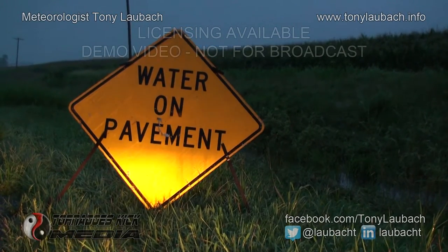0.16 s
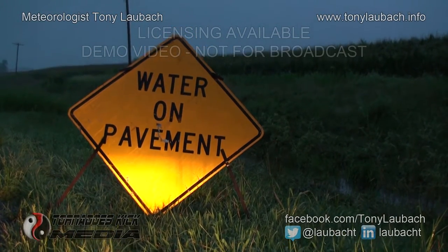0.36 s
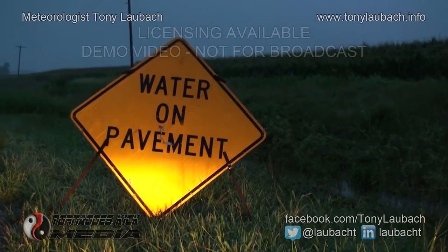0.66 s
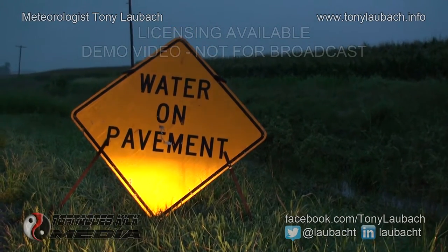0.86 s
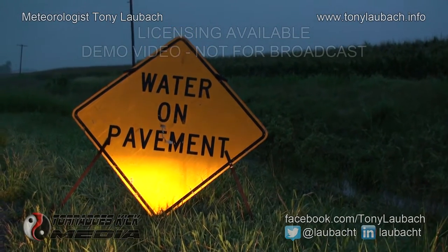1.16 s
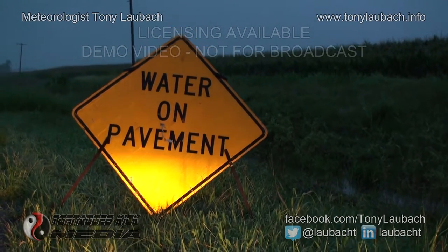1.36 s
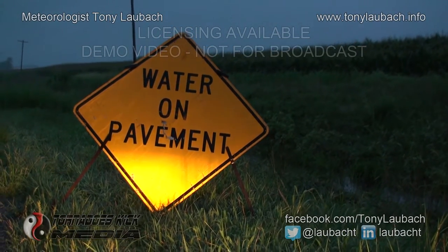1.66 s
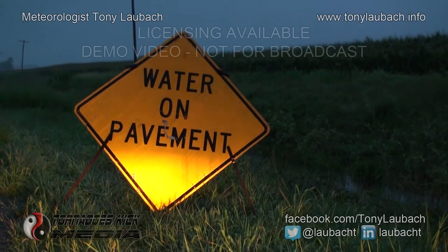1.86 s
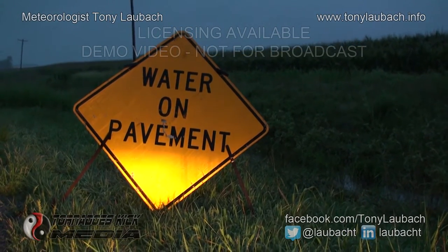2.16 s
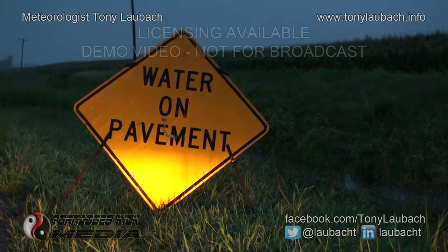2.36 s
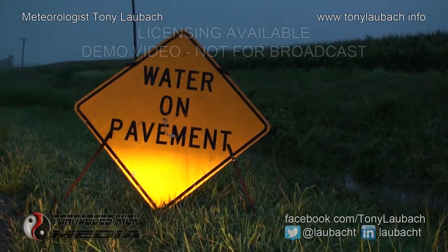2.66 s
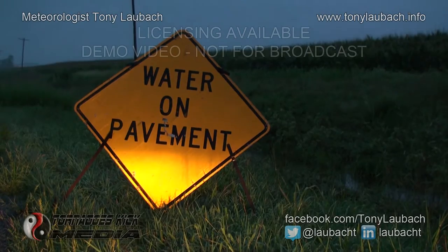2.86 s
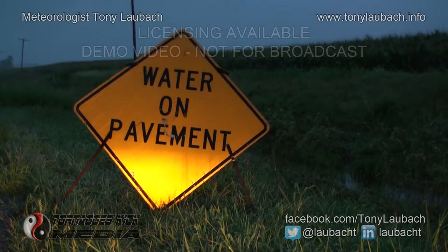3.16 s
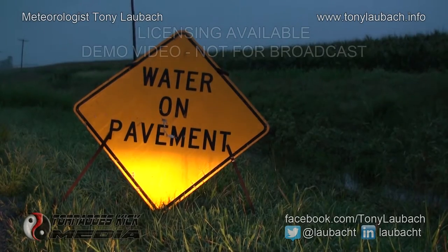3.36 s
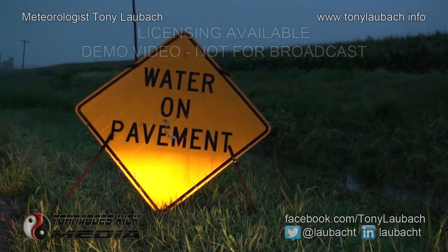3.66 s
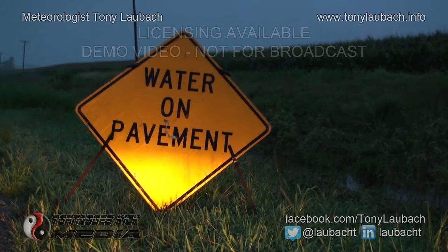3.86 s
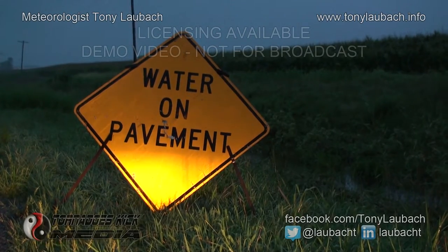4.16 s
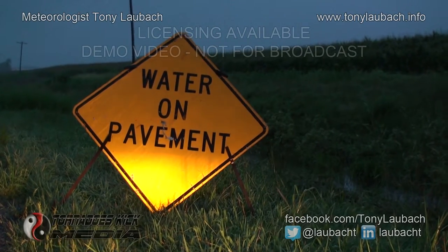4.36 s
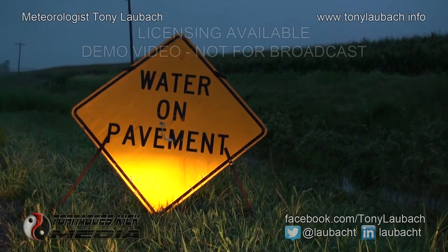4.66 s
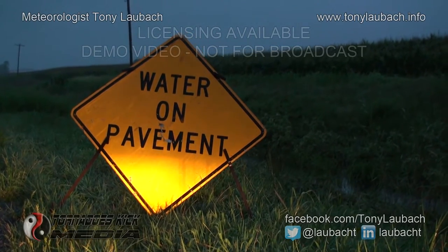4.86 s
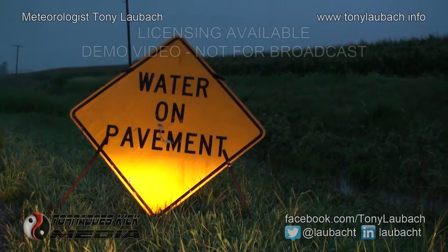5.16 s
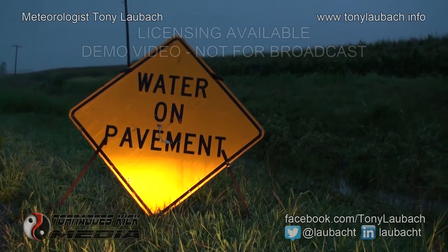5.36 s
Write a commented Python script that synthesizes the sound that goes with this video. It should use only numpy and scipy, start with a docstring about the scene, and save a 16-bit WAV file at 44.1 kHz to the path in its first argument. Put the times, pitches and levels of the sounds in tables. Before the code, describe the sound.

A quiet open roadside with a fixed stereo microphone: a faint wide rush of air, lightly pulsing high insect trills and a low, steady engine idle close by. From the start a distant vehicle is a thin wet hiss, with a slight puddle swell in the first half second. At about 1.4 s there is one small, soft, short knock. From 2 s the tyre hiss rises in uneven surges, stronger around 3 and 3.4 s, with low throbs and a faint drivetrain drone. From 3.7 s deeper water brings continuous bright spray and fine mist over tread noise and roar, growing fast and leaning left. Close echoes give a hollow, upward-sweeping colour around 4.5 to 5.2 s. The rush is loudest near 5 s; the vehicle draws level at about 5.3 s with booming, ringing tyre resonances, the drone sinking and the finest hiss falling away as the sound ends at 5.5 s.

```python
"""Car passing on a flooded road

A vehicle comes up a wet country road and draws past on the left, its tyres hissing, throbbing and throwing
spray: filtered noise and tiny random impacts, made louder and quieter by distance, angle and puddles.
A nearby surface adds short echoes; the notches they cut glide upward as the vehicle comes close.
An engine idles close by (sine waves), insects trill (pulsing bands of noise), something knocks once (ringing
sines), and open country rushes faintly (noise)."""
import sys
import numpy as np
from scipy import signal
from scipy.fft import rfft, irfft, next_fast_len
from scipy.io import wavfile
from scipy.ndimage import uniform_filter1d, map_coordinates

SR = 44100
rng = np.random.default_rng(int(sys.argv[2]) if len(sys.argv) > 2 else 0)


def store_pcm(level_fs):
    """Save levels as 16-bit WAV."""
    pcm = np.round(np.clip(level_fs, -1, 1) * 32767).astype(np.int16)
    wavfile.write(sys.argv[1], SR, np.atleast_2d(pcm).T)


N = 242991

# Basic curves of the pass, which each layer may scale or shift:
# t/s, left against right/dB, scattered against direct sound/dB
PASS_CURVES = [(0, 1, 5.5), (1.5, 1.5, 3), (2.5, 2, -0.5), (3.3, 2.5, -1.5), (4.3, 3.5, -0.5),
               (4.9, 4.5, -1), (5.25, 5.5, 7.5), (5.51, 7, 10.5)]
# Echo from a nearby surface: t/s, lag/ms, strength in the middle range (0-1), strength at all frequencies (0-1)
ECHO_CURVES = [(0, 1.42, 0.15, 0.1), (2.5, 1.41, 0.14, 0.11), (3.5, 1.39, 0.18, 0.1),
               (4.1, 1.36, 0.28, 0.08), (4.45, 1.29, 0.28, 0.08), (4.74, 1.24, 0.72, 0.08),
               (4.97, 1.21, 0.62, 0.06), (5.12, 1.1, 0.1, 0.02), (5.16, 0.48, 0.1, 0),
               (5.3, 0.6, 0.22, 0.03), (5.51, 0.66, 0.32, 0.12)]
# Tone colours of the noises, each later brought to its own loudness: f/Hz, relative level per Hz/dB
RUMBLE_SPECTRUM = [(25, -26), (60, -11), (90, -4.5), (140, 0), (210, -2), (285, -0.5), (340, -2.5),
                   (430, -14), (700, -30)]
ROAR_SPECTRUM = [(220, -57), (380, 0), (480, 0), (620, 1.5), (800, -0.5), (1050, 2), (1300, -5.5),
                 (2200, -36)]
TREAD_SPECTRUM = [(700, -40), (1050, -10.5), (1300, -2), (1500, 0), (1850, 0.5), (2150, -2), (2500, -1.5),
                  (2950, -4), (3500, -8), (5500, -46)]
HISS_SPECTRUM = [(1900, -22), (2700, -5), (3300, 2), (3700, 2.5), (4100, 4), (5000, -1.5), (5700, -7),
                 (7000, -6), (10000, -52)]
SPRAY_SPECTRUM = [(3500, -33), (4900, -2), (5600, -2), (7000, -2), (8200, -2.5), (9000, -4.5), (10500, -27),
                  (14000, -50)]
MIST_SPECTRUM = [(6500, -17.5), (8500, -5), (9500, 2), (10500, 2), (11100, 0), (11550, 1.5), (12150, -1),
                 (12700, -4), (13800, -7), (15500, -25)]
FIELD_SPECTRUM = [(25, -19), (70, -6), (200, -2), (340, 5), (450, 3), (680, 7), (1000, 4.5), (1300, 9),
                  (1850, -0.5), (2100, -1), (2500, 0.5), (2950, -9), (3500, 1), (4150, -8), (4430, -12),
                  (4800, -6.5), (5600, -6), (7000, -11), (9000, -11), (12500, -23), (14000, -48)]
# Tones of the idling engine, before their small wavering: f/Hz, rms level/dB
IDLE_TONES = [(38.7, -63), (77.4, -58.5), (97.2, -52.5), (134, -58), (206, -54)]
# Insect choruses, before pulsing and wavering: f/Hz, width/Hz, level/dB, pulse rate/Hz
INSECT_CHORUSES = [(7130, 870, -56.5, 19), (8070, 110, -68, 64), (6030, 310, -63.5, 63)]
# Drivetrain drone, sinking with the Doppler shift: t/s, base pitch/Hz, level/dB
DRIVE_CURVES = [(0, 72.8, -66), (2, 72.7, -55), (3, 71.64, -56), (3.55, 70.7, -46), (4.3, 69.3, -50),
                (4.8, 68.1, -52), (5.2, 66, -49), (5.51, 62, -48)]
# Tones of that drone: multiple of the base pitch, level added to the drone's/dB
DRONE_TONES = [(2, -6), (4, -2), (4.6, -8), (5.85, -10)]
# Resonances of wheel wells and tread grooves, before the echo:
# t of the peak/s, length/s, f/Hz, width/Hz, peak level/dB, left against right/dB
WHEEL_RESONANCES = [(5.5, 0.33, 73, 38, -51, -1), (5.37, 0.45, 161, 106, -38, 6),
                    (5.08, 0.43, 368, 99, -41.5, 7), (5.27, 0.33, 630, 350, -36.5, 10),
                    (5.22, 0.23, 1220, 450, -40.5, 17), (5.28, 0.57, 2330, 900, -34.5, 6.5),
                    (5.36, 0.51, 3070, 1000, -33.5, 8)]
# How each tyre layer radiates: level at the closest point before the side-on loss/dB,
# loss per doubling of distance/dB, loss side on/dB, half width of that loss/degrees
LAYER_RADIATION = {"rumble": (-34.5, 10, 7, 28.5), "roar": (-33, 14, 6, 29.5),
                   "tread": (-24.5, 17, 10, 26.5), "hiss": (-22.5, 21.5, 14, 36),
                   "spray": (-32.5, 19, 6, 19.5), "mist": (-38.5, 17, 7.5, 29)}
# Puddles: t of entry/s, length/s, depth (0-1), build-up time before a layer's own factor/s
PUDDLE_TIMES = [(0.046, 0.36, 0.37, 0.07), (2.036, 0.37, 0.15, 0.091), (2.497, 0.7, 0.34, 0.12),
                (2.938, 0.45, 0.94, 0.08), (3.416, 0.33, 0.79, 0.06), (3.716, 1.8, 1, 0.14)]
# Brief swells of noise in single bands: t of the peak/s, length/s, f/Hz, width/Hz, peak level/dB
NOISE_SWELLS = [(0.26, 0.07, 3970, 2000, -54), (0.6, 0.082, 3400, 2600, -60), (0.75, 0.38, 4910, 600, -59),
                (1.55, 0.25, 3470, 400, -67), (1.62, 0.046, 7350, 5000, -58), (2.02, 0.28, 3870, 400, -55),
                (2.13, 0.08, 7000, 2000, -49.5), (2.277, 0.059, 9500, 7000, -52),
                (2.548, 0.1, 10500, 4000, -52), (2.82, 0.24, 3930, 2230, -42),
                (2.924, 0.15, 3280, 260, -45), (3.015, 0.04, 6840, 3000, -41),
                (3.082, 0.092, 2450, 400, -43), (3.26, 0.077, 7100, 3500, -41),
                (4.174, 0.19, 2660, 400, -35.5), (4.273, 0.1, 5450, 500, -33), (4.33, 0.38, 1640, 500, -40),
                (4.8, 0.29, 11500, 2540, -32.5), (5.028, 0.18, 8000, 3000, -30.5),
                (5.194, 0.15, 4300, 2400, -30.5), (5.362, 0.06, 7050, 1800, -37)]
# Throbs on rough road: t of the peak/s, length/s, f/Hz, width/Hz, peak level/dB
ROAD_THROBS = [(2.238, 0.073, 284, 98, -48), (2.7, 0.24, 281, 50, -53), (2.75, 0.27, 143, 25, -52),
               (3.313, 0.08, 287, 98, -44), (3.36, 0.059, 105, 70, -43), (3.597, 0.13, 284, 70, -37.5),
               (3.902, 0.09, 289, 120, -42), (4.0, 0.19, 141, 50, -42), (4.016, 0.12, 310, 98, -44),
               (4.476, 0.09, 307, 98, -39), (4.658, 0.04, 272, 98, -40), (4.94, 0.04, 290, 160, -41.5),
               (5.059, 0.02, 140, 140, -37.5), (5.153, 0.06, 175, 120, -39), (5.265, 0.04, 176, 120, -39.5),
               (5.424, 0.075, 150, 140, -36)]
# Ringing of one faint knock: f/Hz, level added to the knock's/dB, time to fall by 60 dB/s
KNOCK_RINGING = [(738, -1, 0.082), (1980, 1, 0.09), (3470, -9, 0.05)]
# How the sound of the water falls away around the pass: start t/s, fall rate/(dB per s)
WATER_FALL = {"hiss": (5.355, 67), "spray": (5.316, 37), "mist": (5.08, 24)}

KNOCK_S, KNOCK_DB = 1.362, -38
# The straight drive: moment of drawing level, speed, closest distance
PASS_S, SPEED_M_PER_S, CLOSEST_M = 5.31, 13.11, 21
HISS_WET_DB, SPRAY_WET_DB, MIST_WET_DB = 5.0, 10.5, 15  # gain at full water: the finer the drops, the more
FILM_DEPTH = 0.18  # water amount (0-1) at which the hiss already has three quarters of its gain
SETTLE_S = 0.24  # decay time of thrown water after a puddle
HEAVY_BUILD, MIST_BUILD = 0.62, 0.58  # factors on the build-up time of the puddles
# An upright echo just ahead of the inverted one: its lag and gain as shares of the inverted one's
UPRIGHT_LAG, UPRIGHT_GAIN = 0.868, 0.46
# Dip in the right channel side on: centre, half width, depth (0-1), half width of the angle
SHADE_HZ, SHADE_WIDTH_HZ, SHADE_DEPTH, SHADE_DEG = 836, 550, 0.43, 16
TOP_HZ = 15700  # nothing is kept from here up


def amp(db):
    """Turns decibels into gain."""
    return 10 ** (np.asarray(db) / 20)


def unit(x):
    """Brings x to rms 1."""
    return x / np.sqrt(np.mean(x ** 2) + 1e-20)


def along(points, hz):
    """Reads (f/Hz, value) points along a log frequency axis."""
    f, values = np.transpose(points)
    return np.interp(np.log(hz + 1), np.log(f + 1), values)


def curves(rows):
    """Gives one value per sample for each column after the time."""
    times, *columns = np.transpose(rows)
    return [np.interp(np.arange(N) / SR, times, column) for column in columns]


def wobble(rate):
    """Draws a smooth random curve through `rate` random points a second."""
    knots = rng.standard_normal(int(N * rate / SR) + 4)
    return map_coordinates(knots, [np.arange(N) * rate / SR])


def swell(peak_s, length_s):
    """Rises and falls smoothly; `length_s` away from the peak, about 14 % is left."""
    return np.exp(-2 * ((np.arange(N) / SR - peak_s) / length_s) ** 2)


def filtered(x, response):
    """Multiplies the spectrum of x by a response of frequency."""
    size = next_fast_len(N + SR // 2)  # spare room keeps the end from wrapping onto the start
    gain = response(np.fft.rfftfreq(size, 1 / SR))
    return irfft(rfft(x, size) * gain, size)[..., :N]


def coloured(x, spectrum):
    """Gives x a spectrum that falls away above its last point, at rms 1."""
    top_hz = spectrum[-1][0]
    return unit(filtered(x, lambda hz: amp(along(spectrum, hz)) / (1 + (hz / top_hz / 2) ** 10)))


def band(x, hz, width_hz):
    """Keeps one resonance of x, `width_hz` wide at half gain, at rms 1."""
    return unit(filtered(x, lambda f: 1 / (1 + (2 * (f - hz) / width_hz) ** 4)))


def turbulence():
    """Draws two unrelated white noises: one heard directly, one scattered."""
    return rng.standard_normal((2, N))


def droplets(rate, size_db, share):
    """Mixes `rate` tiny unequal impacts a second into direct noise; share is their part of its power."""
    share = np.clip(share, 0, 1)
    strengths = amp(size_db * np.minimum(rng.exponential(size=N), 4))
    signs = rng.choice([-1, 1], N)
    impacts = unit(strengths * signs * (rng.random(N) < rate / SR))
    direct, scattered = turbulence()
    return np.array([np.sqrt(1 - share) * direct + np.sqrt(share) * impacts, scattered])


def place(pair, pan_db, side_db):
    """Leans direct sound to one side (left if positive); scattered sound differs between the ears."""
    direct, scattered = pair
    side = amp(side_db) * scattered
    lean = np.tanh(pan_db * np.log(10) / 40)  # makes the left-right difference exactly pan_db
    return np.array([direct * (1 + lean) + side, direct * (1 - lean) - side])


def drifting(x, depth_db, band_size, frame_size):
    """Narrow bands brighten and dull at random, as in moving air: fully until 1 s, then fading
    to a weaker drift from 4.5 s on."""
    _, t, z = signal.stft(x, SR, nperseg=512)
    patches = rng.standard_normal(z.shape[1:])
    for _ in range(2):
        patches = uniform_filter1d(patches, band_size, 0)
        patches = uniform_filter1d(patches, frame_size, 1)
    strength = np.interp(t, [1, 4.5], [1, .4])
    changed = z * amp(depth_db * strength * unit(patches))
    return signal.istft(changed, nperseg=512)[1][:, :N]


def delayed(x, lag_ms):
    """Plays both channels of x later, by a changing lag."""
    read_at = np.arange(N) - lag_ms * SR / 1000
    return np.array([map_coordinates(channel, [read_at]) for channel in x])


def position():
    """Follows a straight drive: distance (m), and angle from side on (degrees)."""
    ahead_m = SPEED_M_PER_S * (PASS_S - np.arange(N) / SR)
    return np.hypot(ahead_m, CLOSEST_M), np.degrees(np.arctan2(ahead_m, CLOSEST_M))


def side_on(width_deg):
    """Is 1 as the vehicle draws level and shrinks towards 0 away from side on."""
    _, angle_deg = position()
    return np.exp(-(angle_deg / width_deg) ** 2)


def passing_db(layer):
    """Grows a layer as the vehicle nears; tyres beam fore and aft, so it weakens side on."""
    level_db, doubling_db, side_loss_db, width_deg = LAYER_RADIATION[layer]
    distance_m, _ = position()
    doublings = np.log2(distance_m / CLOSEST_M)
    return level_db - doubling_db * doublings - side_loss_db * side_on(width_deg)


def field():
    """The faint, wide rush of open country: noise that drifts in slow patches."""
    rush = drifting(coloured(turbulence(), FIELD_SPECTRUM), depth_db=1.0, band_size=9, frame_size=28)
    return amp(-47 + 0.21 * wobble(4.0)) * place(rush, pan_db=0.0, side_db=-8.5)


def idle():
    """An idling engine hums in low tones that waver together in pitch and separately in strength."""
    clock = np.cumsum(1 + 0.0029 * wobble(3.13) + 0.0014 * wobble(14)) / SR
    hum = np.zeros(N)
    for hz, db in IDLE_TONES:
        strength = amp(db + 0.35 * wobble(4.34))
        hum += strength * np.sin(2 * np.pi * (hz * clock + rng.random()))
    return np.sqrt(2) * hum  # a sine of rms 1 peaks at the root of 2


def insects():
    """Many insects of each kind blur into a narrow, lightly pulsing band of noise."""
    chorus = np.zeros((2, N))
    for hz, width_hz, db, pulse_rate in INSECT_CHORUSES:
        pulse_phase = np.cumsum(pulse_rate * (1 + 0.048 * wobble(2.6))) / SR
        pulses = 1 + 0.19 * np.sin(2 * np.pi * pulse_phase)
        waver_db = 0.3 * wobble(5)
        kind = place(band(turbulence(), hz, width_hz), pan_db=-0.5, side_db=-10.0)
        chorus += amp(db + waver_db) * pulses * kind
    return chorus


def drivetrain():
    """Turning parts make a faint, rough drone whose pitch sinks as the vehicle draws level."""
    hz, db = curves(DRIVE_CURVES)
    pan_db, _ = curves(PASS_CURVES)
    turns = np.cumsum(hz * (1 + 0.0036 * wobble(8))) / SR
    drone = np.zeros(N)
    for multiple, level_db in DRONE_TONES:
        strength = amp(level_db + 1.5 * wobble(5.7))
        drone += strength * np.sin(2 * np.pi * (multiple * turns + rng.random()))
    return amp(db) * drone * amp(np.array([pan_db, -pan_db]) * 0.2)


def tyres():
    """Tyre bodies rumble, air roars around the wheels, and the tread pumps air and water from its grooves."""
    pan_db, scatter_db = curves(PASS_CURVES)
    rumble = place(coloured(turbulence(), RUMBLE_SPECTRUM), 1.0 * pan_db, -26.0 + 0.13 * scatter_db)
    roar = place(coloured(turbulence(), ROAR_SPECTRUM), 2.9 * pan_db - 6.5, -8.0 + 0.21 * scatter_db)
    grooves = coloured(droplets(rate=3000, size_db=3, share=0.27), TREAD_SPECTRUM)
    tread = place(grooves, 1.03 * pan_db, -12.5 + 1.04 * scatter_db)
    tread_db = passing_db("tread") + 0.26 * wobble(12)
    return amp(passing_db("rumble")) * rumble + amp(passing_db("roar")) * roar + amp(tread_db) * tread


def thrown_water(build_factor):
    """Water in the air (0-1): each puddle splashes up, holds and settles; the strongest one counts."""
    t = np.arange(N) / SR
    amounts = []
    for start_s, length_s, depth, build_s in PUDDLE_TIMES:
        rise = 1 - np.exp(-np.maximum(t - start_s, 0) / (build_factor * build_s))
        settling = np.exp(-np.maximum(t - start_s - length_s, 0) / SETTLE_S)
        amounts.append(depth * rise * settling)
    return np.max(amounts, axis=0)


def water_db(layer):
    """The level of a water layer along the pass, with its extra fall around the moment of passing."""
    start_s, db_per_s = WATER_FALL[layer]
    return passing_db(layer) - db_per_s * np.maximum(np.arange(N) / SR - start_s, 0)


def water():
    """The water film tears into hiss, spray and mist, swelling in puddles and surging together at random."""
    heavy, fine = thrown_water(HEAVY_BUILD), thrown_water(MIST_BUILD)
    pan_db, scatter_db = curves(PASS_CURVES)
    hiss = coloured(droplets(rate=3300, size_db=6.5, share=0.11), HISS_SPECTRUM)
    spray = coloured(droplets(rate=2900, size_db=1.5, share=0.36), SPRAY_SPECTRUM)
    mist = coloured(droplets(rate=3300, size_db=3.0, share=0.39), MIST_SPECTRUM)
    hiss_db = water_db("hiss") + HISS_WET_DB * np.tanh(heavy / FILM_DEPTH)
    spray_db = water_db("spray") + SPRAY_WET_DB * heavy
    mist_db = water_db("mist") + MIST_WET_DB * fine
    hiss = amp(hiss_db) * place(hiss, pan_db, -18.0 + scatter_db)
    spray = amp(spray_db) * place(spray, pan_db, -26.0 + 1.9 * scatter_db)
    mist = amp(mist_db) * place(mist, 1.26 * pan_db, -20 + 1.8 * scatter_db)
    surge_db = .42 * wobble(16) + .25 * wobble(70)
    return amp(surge_db) * (hiss + spray + mist)


def noise_swells():
    """Brief swells of grainy noise in single bands, from low to very high, scattered through the approach."""
    pan_db, scatter_db = curves(PASS_CURVES)
    grains = droplets(rate=2500, size_db=5.5, share=0.38)
    swells = np.zeros((2, N))
    for peak_s, length_s, hz, width_hz, db in NOISE_SWELLS:
        swells += amp(db) * swell(peak_s, length_s) * band(grains, hz, width_hz)
    return place(swells, pan_db, -17 + scatter_db)


def knock():
    """A small, soft contact rings briefly: a few sines that die away."""
    t = np.maximum(np.arange(N) / SR - KNOCK_S, 0)
    ring = sum(amp(db - 60 * t / t60) * np.sin(2 * np.pi * hz * t) for hz, db, t60 in KNOCK_RINGING)
    soft_start = 1 - np.exp(-t / 0.003)
    return amp(KNOCK_DB) * soft_start * ring


def throbs():
    """On rough road the tyres and the air inside them boom in uneven lumps."""
    pan_db, _ = curves(PASS_CURVES)
    air = turbulence()
    lumps = np.zeros((2, N))
    for peak_s, length_s, hz, width_hz, db in ROAD_THROBS:
        lumps += amp(db) * swell(peak_s, length_s) * band(air, hz, width_hz)
    return place(lumps, 0.67 * pan_db, side_db=-12)


def flanks():
    """Near side on, wheel wells boom and tread grooves ring like short pipes, each with its own peak."""
    ringing = np.zeros((2, N))
    for peak_s, length_s, hz, width_hz, db, pan_db in WHEEL_RESONANCES:
        resonance = place(band(turbulence(), hz, width_hz), pan_db, side_db=-23)
        ringing += amp(db) * swell(peak_s, length_s) * resonance
    return ringing


def reflected(x, best_hz, focus):
    """Adds close echoes that cut a moving comb of notches, deepest in the middle range."""
    lag_ms, middle, broad = curves(ECHO_CURVES)
    middle_range = filtered(x, lambda hz: 1 / np.sqrt(1 + (focus * (hz / best_hz - best_hz / (hz + 1))) ** 2))
    inverted_middle = -middle * delayed(middle_range, lag_ms)
    upright = UPRIGHT_GAIN * delayed(x, UPRIGHT_LAG * lag_ms)
    return x + inverted_middle + broad * (upright - delayed(x, lag_ms))


def shaded(x):
    """As the vehicle draws level, part of its roar drops out of the right channel, as if shaded."""
    left, right = x
    hidden = filtered(right, lambda hz: np.exp(-((hz - SHADE_HZ) / SHADE_WIDTH_HZ) ** 2))
    return np.array([left, right - np.clip(SHADE_DEPTH, 0, 1) * side_on(SHADE_DEG) * hidden])


def scene():
    """Sets the vehicle and its echo over the sounds of the roadside."""
    rolling = reflected(tyres() + water() + flanks(), best_hz=2380, focus=8)
    through_air = drifting(rolling + noise_swells(), depth_db=1.0, band_size=3, frame_size=36)
    vehicle = through_air + throbs() + drivetrain()
    return shaded(vehicle) + idle() + insects() + knock() + field()


def record(dry):
    """Cuts off everything from the band limit up."""
    return filtered(dry, lambda hz: hz < TOP_HZ)


dry = scene()
out = record(dry)
store_pcm(out)
```